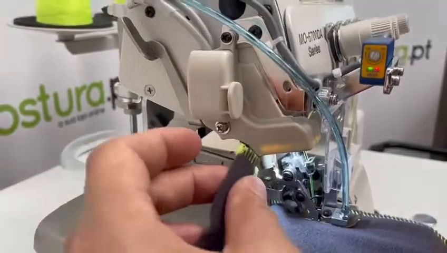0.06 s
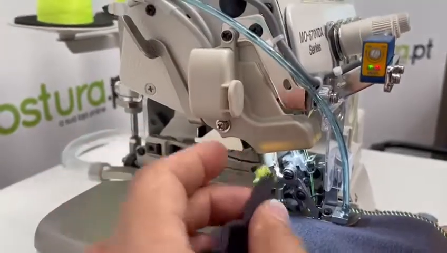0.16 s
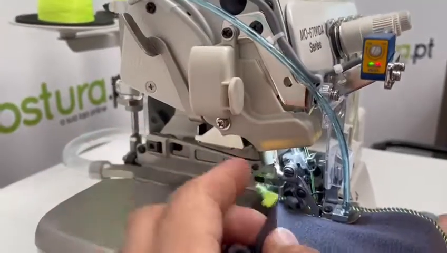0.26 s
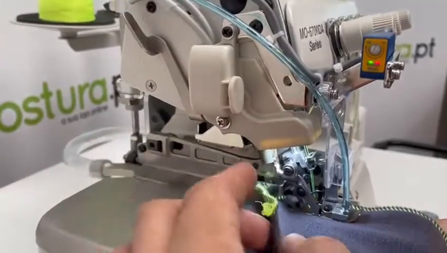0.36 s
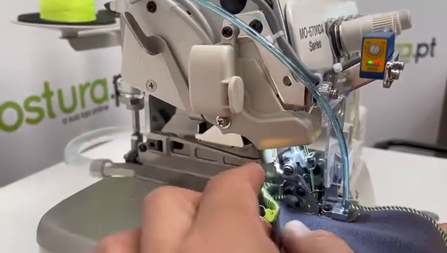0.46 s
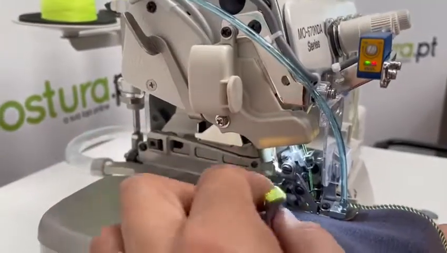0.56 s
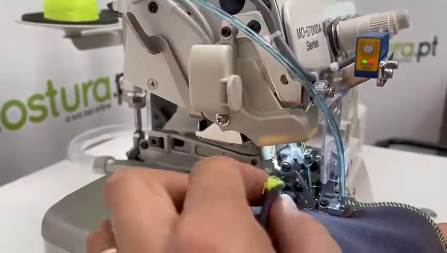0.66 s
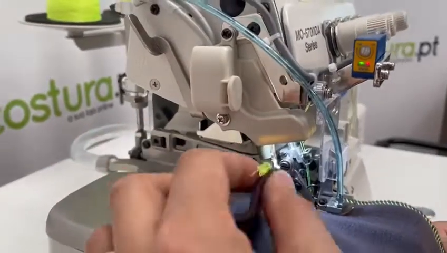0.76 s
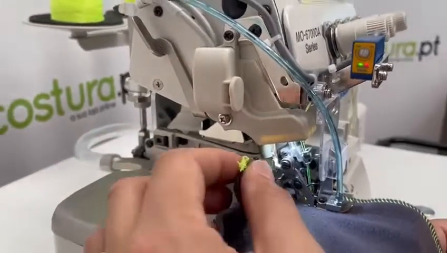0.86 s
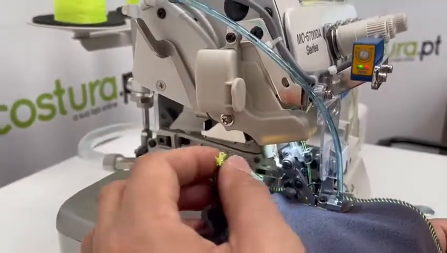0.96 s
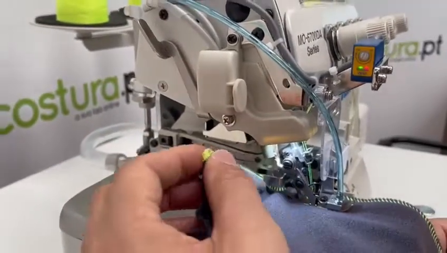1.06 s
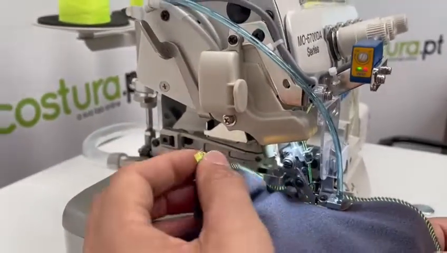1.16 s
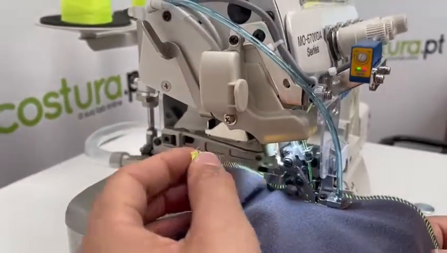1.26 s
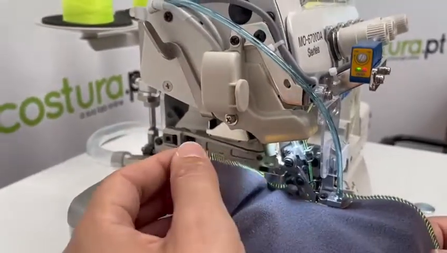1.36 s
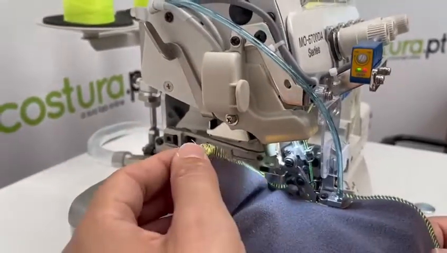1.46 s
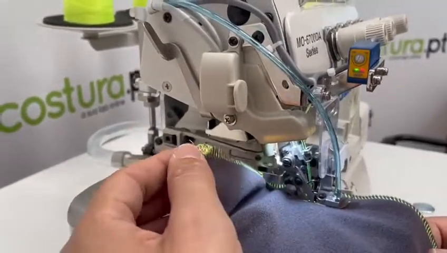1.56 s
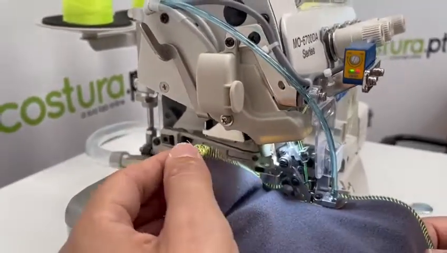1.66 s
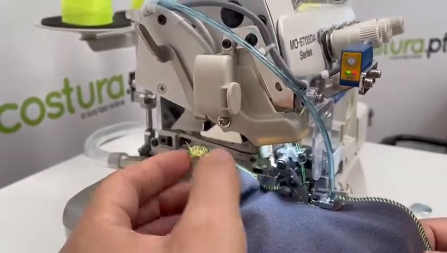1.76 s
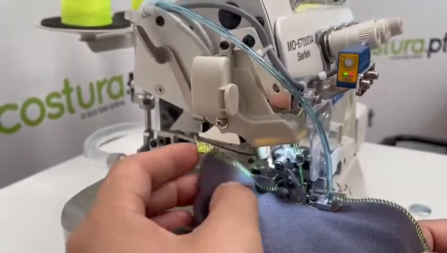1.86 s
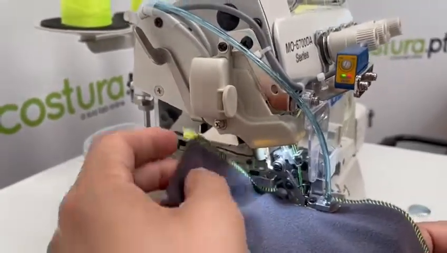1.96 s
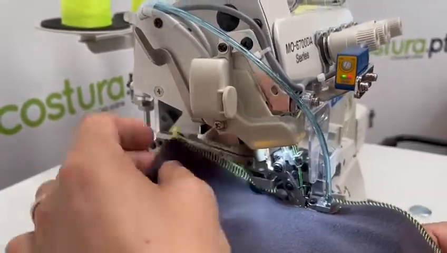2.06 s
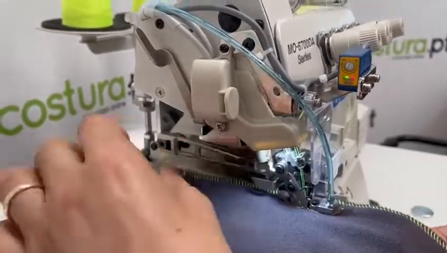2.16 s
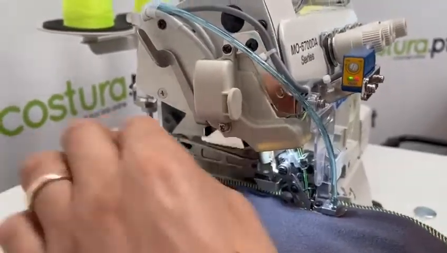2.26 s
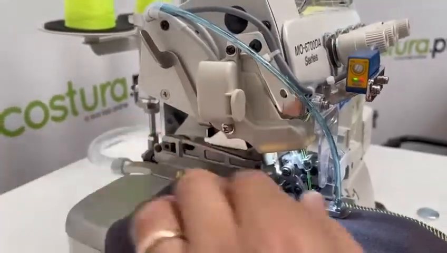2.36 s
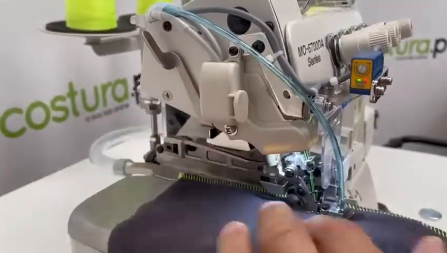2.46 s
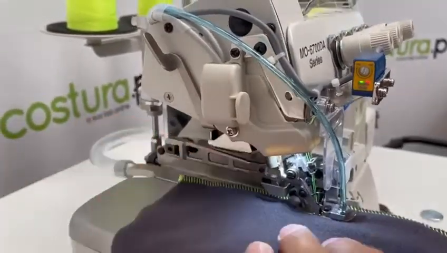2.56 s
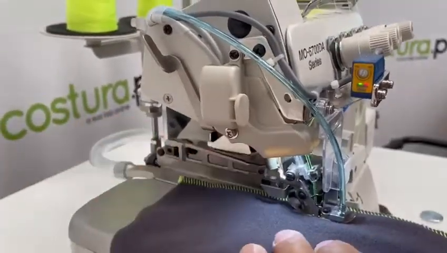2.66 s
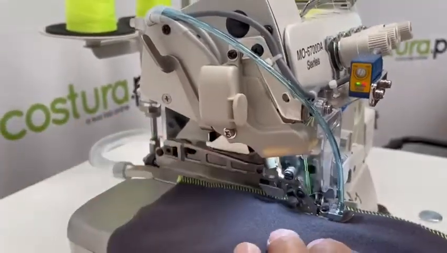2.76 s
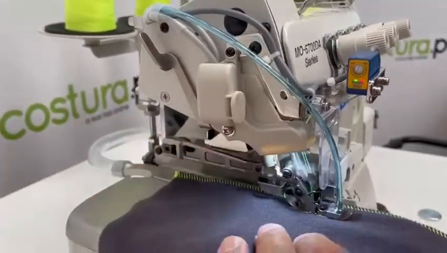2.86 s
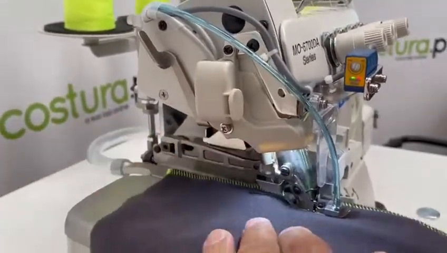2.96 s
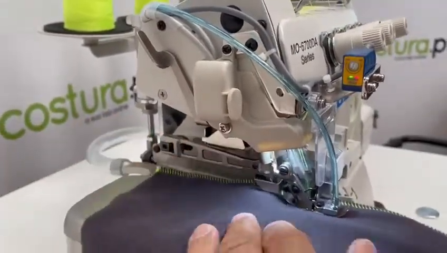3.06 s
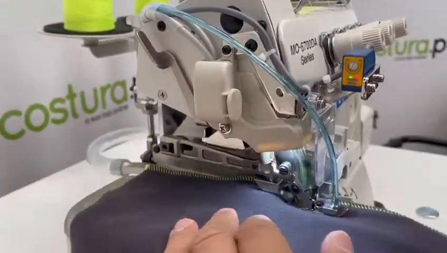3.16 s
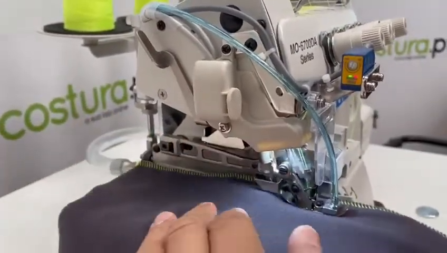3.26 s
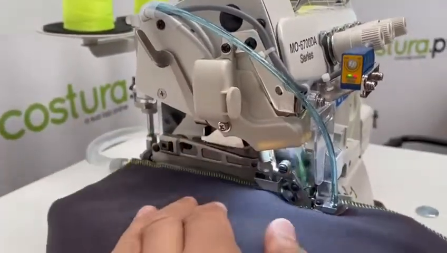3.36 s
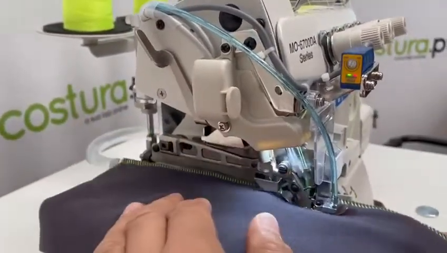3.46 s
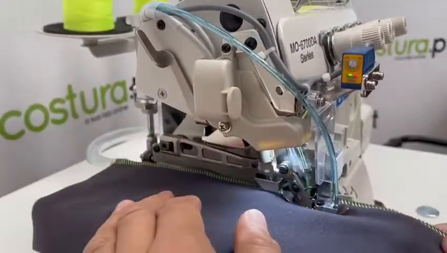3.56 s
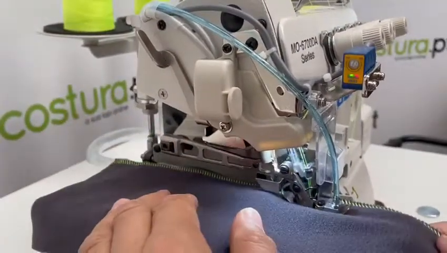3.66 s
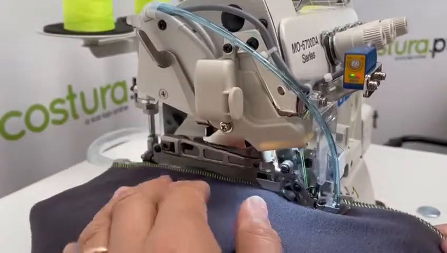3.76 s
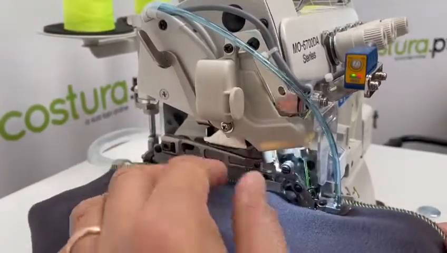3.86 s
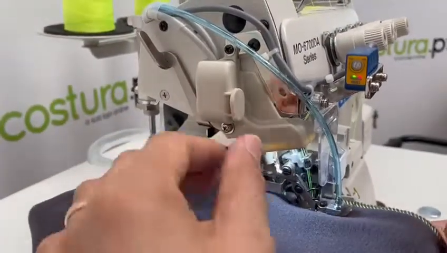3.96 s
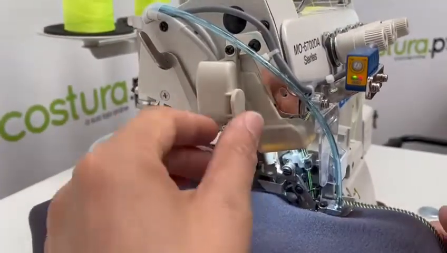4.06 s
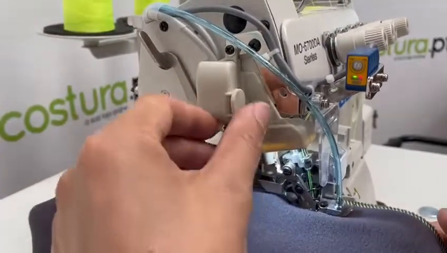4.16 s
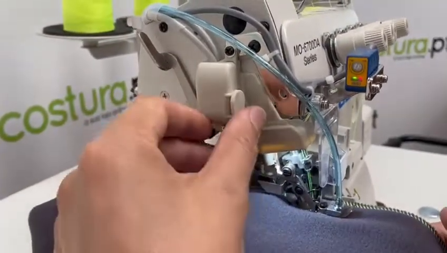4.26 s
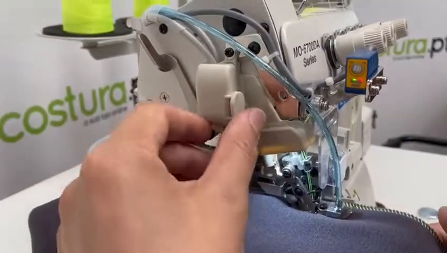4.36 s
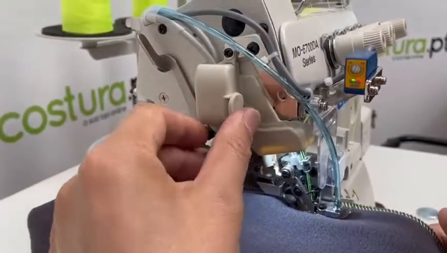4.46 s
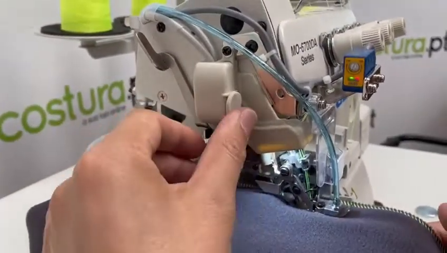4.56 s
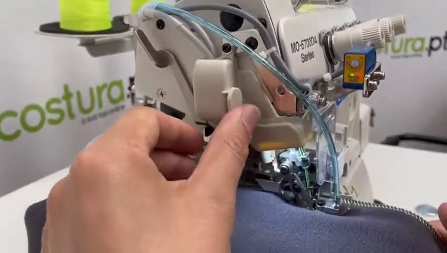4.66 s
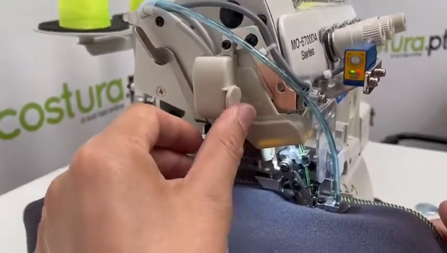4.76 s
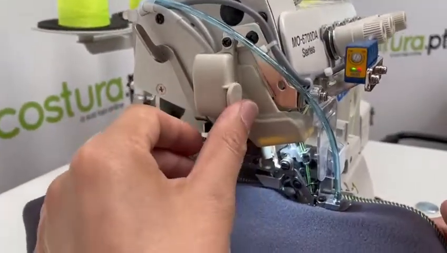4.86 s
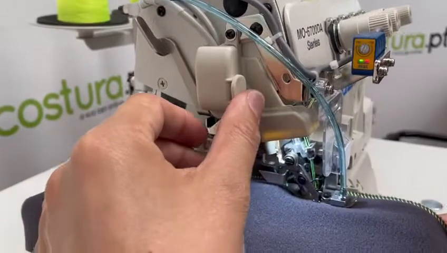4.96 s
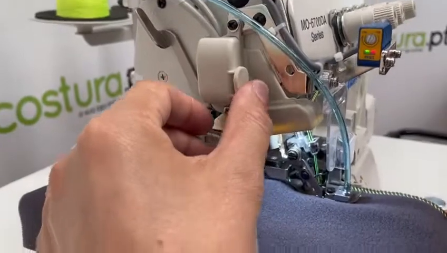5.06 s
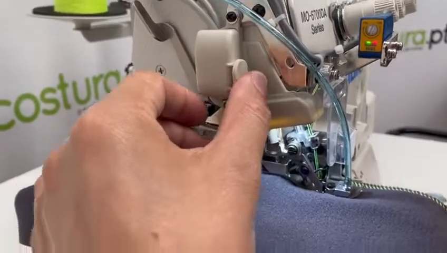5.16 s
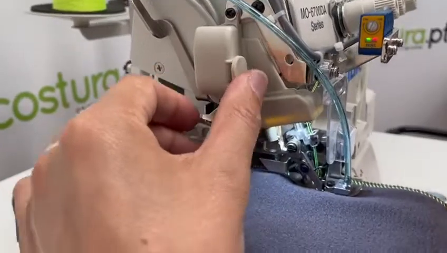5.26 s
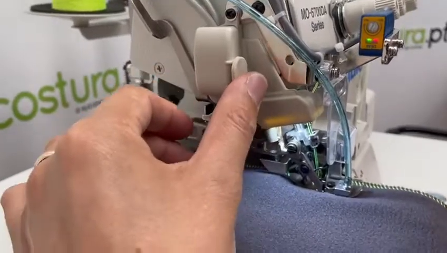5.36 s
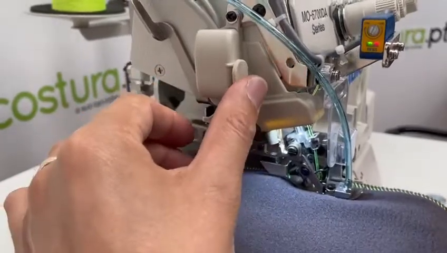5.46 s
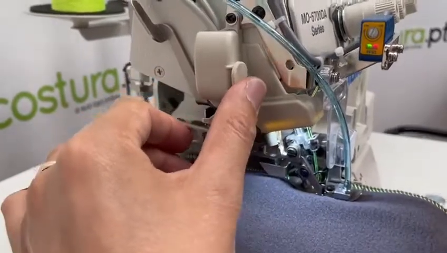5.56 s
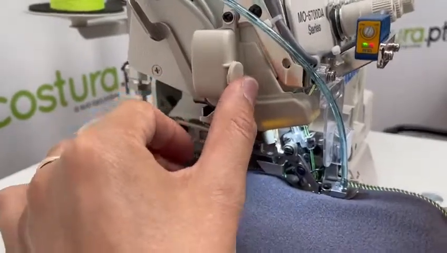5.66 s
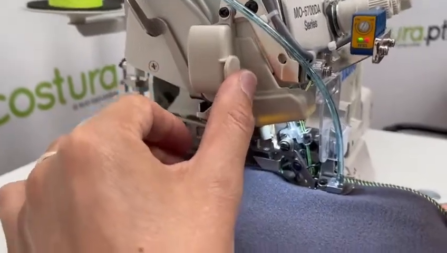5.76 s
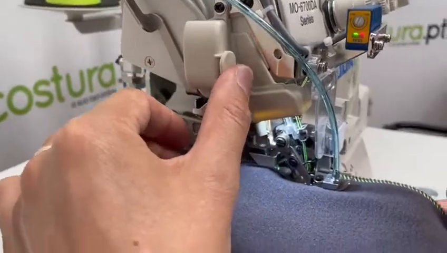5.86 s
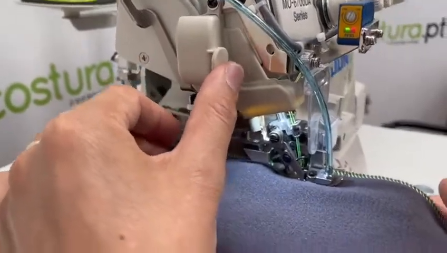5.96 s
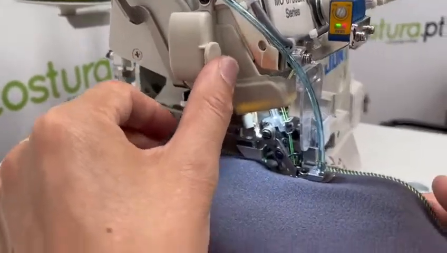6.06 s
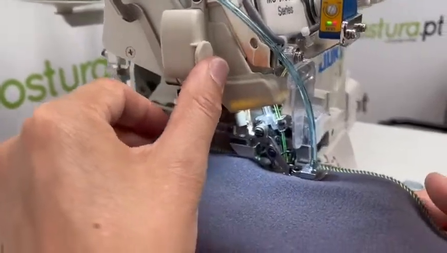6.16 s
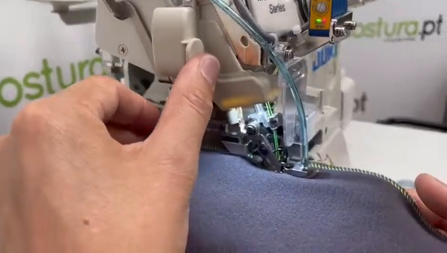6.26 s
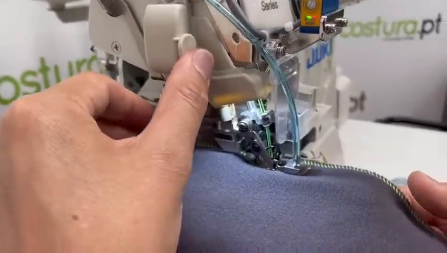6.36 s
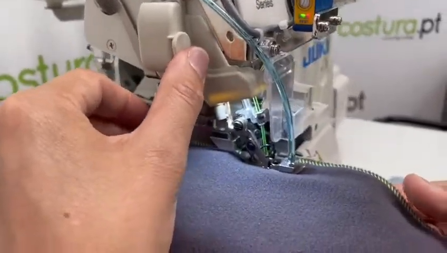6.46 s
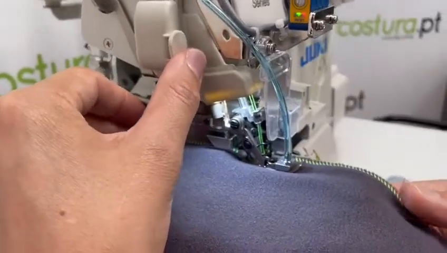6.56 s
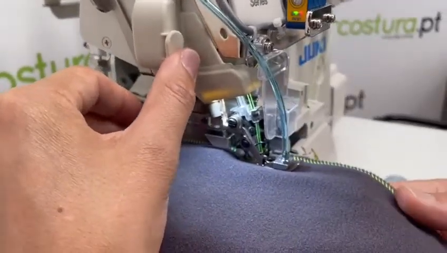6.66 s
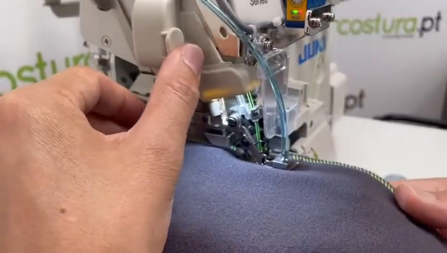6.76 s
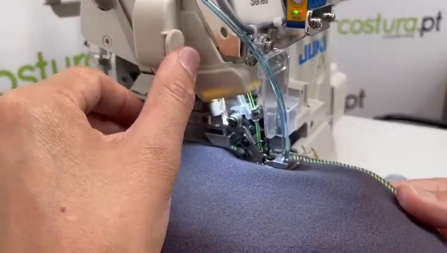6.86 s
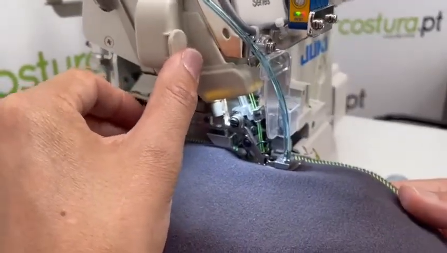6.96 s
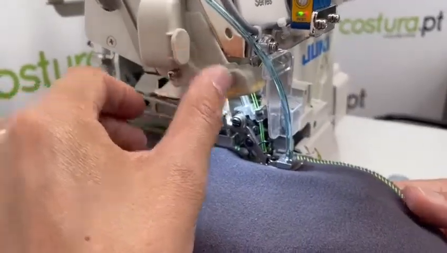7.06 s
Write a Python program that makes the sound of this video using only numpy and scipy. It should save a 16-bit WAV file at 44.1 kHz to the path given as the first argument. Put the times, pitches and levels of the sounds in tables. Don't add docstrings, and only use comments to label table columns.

```python
import sys
import numpy as np
from scipy import signal
from scipy.fft import rfft, irfft, next_fast_len
from scipy.io import wavfile
from scipy.ndimage import uniform_filter1d, map_coordinates

SR = 44100
rng = np.random.default_rng(int(sys.argv[2]) if len(sys.argv) > 2 else 0)


def nominal_scale(level):
    x = np.asarray(level, float) / 20
    return 10 ** x


def digitize_waveform(pressure):
    field = np.atleast_2d(pressure).T
    bounded = np.clip(field, -1, 1)
    quanta = np.round(bounded * 32767).astype(np.int16)
    wavfile.write(sys.argv[1], SR, quanta)


N = 313110

# start_s, level_db
RUMBLE_LEVEL = [(0, -62), (.25, -59.5), (.7, -55), (.96, -59.5), (1.25, -54.5), (1.7, -59), (2.27, -56.5),
                (2.65, -58), (4.6, -55), (5.03, -58), (5.5, -54), (6.2, -52), (6.63, -50.5), (6.84, -59),
                (7.1, -48)]
# pitch_hz, level_db_per_hz
RUMBLE_SPECTRUM = [(13, -39.5), (22, -20), (32, -3), (54, 1.5), (82, -5), (171, -26), (200, -24),
                   (260, -47.5), (440, -120)]
FAR_SPECTRUM = [(88, -16.5), (150, -6), (264, -8), (347, -12.5), (533, -19), (643, -25.5), (701, -26.5),
                (1520, -34.5), (9000, -58.5), (11700, -81), (19800, -120)]
# start_s, length_s, rustle_db, rub_db
STROKES = [(0.035, 0.29, -84, -86), (.2, .18, -92, -81.5), (0.518, 0.12, -84.5, -77),
           (0.694, 0.066, -90, -89), (0.754, 0.087, -85, -88), (0.923, 0.096, -94, -90),
           (1.03, .11, -85, -83), (1.188, 0.085, -100, -85), (1.285, 0.083, -91.5, -83),
           (1.843, 0.096, -90.5, -81.5), (1.922, 0.1, -94, -82), (2.087, 0.12, -83, -76.5),
           (2.23, 0.042, -107, -92), (2.407, 0.21, -90, -84.5), (2.55, 0.41, -82, -77)]
# pitch_hz, level_db_per_hz
RUSTLE_SPECTRUM = [(4500, -38), (6000, -9), (7500, -4), (9000, -1), (11500, -11), (12100, -33)]
RUB_SPECTRUM = [(300, -32), (700, 7), (1500, 1.5), (2500, -1.5), (4000, -9), (5500, -13.5), (7000, -32)]
# pitch_hz, level_db
RUB_TILT = [(600, -7.5), (2000, 0), (4500, 4.5)]
# start_s, peak_db, pitch_hz, t60_s
KNOCKS = [(.377, -59, 840, 0.029), (1.17, -53.5, 970, 0.044), (1.3, -60, 950, 0.11),
          (1.495, -64, 500, 0.07), (1.844, -61, 940, 0.059), (1.884, -78, 2200, 0.018),
          (1.979, -45, 360, 0.32), (1.985, -61, 1500, .1), (2.016, -59, 1050, 0.083),
          (2.02, -51.5, 350, 0.36), (2.204, -61, 1677, 0.03), (2.207, -68.5, 3500, 0.028),
          (3.632, -25.5, 1970, 0.031), (3.648, -23, 2046, 0.043), (3.667, -25, 1710, 0.016)]
# start_s, peak_db, boom_db, tick_db
VALVE_BLOWS = [
    (2.6904, -39.5, -18, 16.5),
    (2.698, -20, -19, -16.5),
    (2.702, -14, -2.5, -19),
    (3.685, -26.5, -9, -17),
    (3.697, -24, 9, -16.5),
    (4.05, -19.5, -19.5, -15),
    (4.054, -17, 11, -9),
    (4.072, -23.5, -4.5, -31),
    (4.127, -33.5, 19, -24.5),
    (4.134, -38, 2, -39),
]
# pitch_hz, level_db, t60_s
FRAME_MODES = [(90.5, -5, 0.078), (128, -4, 0.034), (227, 2, 0.033), (294.5, 0, 0.065), (350, 6.5, 0.018),
               (554, -1, 0.027), (784, -4, 0.041), (1000, -20, 0.021)]
# pitch_hz, level_db_per_hz
HOSE_SPECTRUM = [(60, -35), (130, -8.5), (250, -17.5), (450, -15.5), (850, -2), (1300, -6), (2200, -9.5),
                 (3200, -19), (5000, -60)]
JET_SPECTRUM = [(800, -53.5), (2000, -8), (3000, -1.5), (3900, 1.5), (4700, -1), (5700, -4.5), (6600, -4),
                (8000, -28.5), (10000, -64)]
NOZZLE_SPECTRUM = [(4500, -43.5), (6500, -7), (7600, 3.5), (8300, 4.5), (9000, 3.5), (11500, 4.5),
                   (12100, -27)]
# pitch_hz, likeness
AIR_LIKENESS = [(50, 1), (300, 0.4), (800, 0.73), (1400, 0.12), (2200, 1), (3000, .8), (4500, .85),
                (7200, .8), (8400, .9), (12000, 0.93)]
# pitch_hz, level_db
AIR_TO_WALLS = [(300, 6.5), (1200, 3), (4000, -5.5), (8000, 3), (11000, -2.5)]
# pitch_hz, level_db_per_hz
MOAN_SPECTRUM = [(350, -50.5), (600, -3.5), (800, 2), (1100, 0.5), (1350, -17.5), (2000, -51)]
# start_s, turns_per_s
SHAFT_SPEED = [(2.86, 40), (3.0, 48), (3.08, 51.7), (3.16, 52.3), (3.22, 51.2), (3.28, 47.3), (3.38, 45.2),
               (3.58, 42.3), (3.72, 38)]
# pitch_hz, width_hz, level_db
CASTING_MODES = [(191, 60, -26.5), (326, 130, -16), (544, 50, -6.5), (733, 76, 0.5), (891.7, 83, 3.5),
                 (1100, 330, -17.5), (1386, 90, -22)]
# start_s, peak_db, lower_modes_db
CLICKS = [(4.523, -18, -18), (4.6753, -16.5, -20), (4.8052, -16.5, -19), (4.9349, -17, -20.5),
          (5.6551, -15.5, -19.5), (5.8245, -18, -17), (5.9636, -15, -19), (6.087, -16.5, -17.5),
          (6.2128, -15.5, -17.5), (6.3514, -17.5, -15.5), (6.6998, -19, -13.5), (6.7662, -17, -14),
          (6.8746, -15, -16.5), (7.021, -14.5, -16)]
# pitch_hz, level_db, t60_s
LEVER_MODES = [(844, -31, 0.086), (1841, -5, 0.013), (2738, 2, 0.0095), (4044, -2, 0.022),
               (4956, -7, 0.031), (6630, -9.5, 0.027)]
LEVER_TOP_MODES = [(9420, -18.5, 0.0064), (9690, -18.5, 0.013)]
# pitch_hz, difference_db
LEVER_SIDE = [(1000, 3), (1900, 6), (2500, 12), (3000, -2), (4000, 10.5), (5300, 7), (6200, 4.5),
              (7500, 4.5), (8200, 0.5)]
# pitch_hz, t60_s
HALL_DECAY = [(100, 0.65), (1000, 0.98), (4000, 0.78), (8000, 0.54), (12000, 0.18)]
# pitch_hz, likeness
FAR_LIKENESS = [(50, 1), (200, 0.97), (800, 0.24), (1600, 0.094), (2500, 0.73), (4000, 0.52), (5000, 0.28),
                (6200, 0.64), (7200, 0.28), (8400, 0.91), (12000, 1)]
# pitch_hz, level_db
PORT_RESPONSE = [(18, -31), (32, -12), (45, -7), (8600, 3), (9500, 9.5), (10300, 10.5), (10900, 11.5),
                 (11300, 7.5), (11700, 2), (12000, -15.5), (12800, -36.5), (13300, -120)]
# pitch_hz, lead_rad
PORT_TURN = [(900, 0), (1500, -.7), (2000, 0), (2900, 1), (4300, .1), (6500, -.2), (7400, .8), (8500, 0),
             (9150, -1.2), (10200, -3.14), (11200, -5.2), (11600, -6.2), (13000, -6.28)]

OPEN_S, SHUT_S = 2.69, 4.047
SPIN_S, BITE_S, BRAKE_S = 2.88, 3.0, 3.64


def unit(x):
    return x / np.sqrt(np.mean(x ** 2) + 1e-20)


def along(points, hz):
    f, v = np.transpose(points)
    return np.interp(np.log(hz + 1), np.log(f + 1), v)


def curve(rows):
    s, value = np.transpose(rows)
    return np.interp(np.arange(N) / SR, s, value)


def swell(start, rise, end, fall):
    t = np.arange(N) / SR
    rising = 1 - np.exp(-np.clip(t - start, 0, None) / rise)
    return rising * np.exp(-np.clip(t - end, 0, None) / fall)


def wobble(rate):
    knots = rng.standard_normal(int(N * rate / SR) + 4)
    coarse = np.arange(0, N + 64, 64)
    return np.interp(np.arange(N), coarse, map_coordinates(knots, [coarse * rate / SR]))


def filtered(x, response):
    m = next_fast_len(x.shape[-1] + SR // 2)
    return irfft(rfft(x, m) * response(np.fft.rfftfreq(m, 1 / SR)), m)[..., :x.shape[-1]]


def paired(pair, alike):
    def shares(hz):
        angle = np.arccos(np.clip(along(alike, hz), -1, 1)) / 2
        return np.array([np.cos(angle), np.sin(angle)])

    mid, side = filtered(pair, shares)
    return np.array([mid + side, mid - side])


def rush(spectrum, patchy_db, alike=FAR_LIKENESS):
    z = signal.stft(rng.standard_normal((2, N)), nperseg=512)[2]
    field = uniform_filter1d(rng.standard_normal(z.shape[1:]), size=6, axis=0)
    field = uniform_filter1d(field, size=10, axis=1)
    pair = signal.istft(z * nominal_scale(patchy_db * unit(field)), nperseg=512)[1][:, :N]
    coloured = filtered(pair, lambda hz: nominal_scale(along(spectrum, hz)))
    return unit(paired(coloured, alike))


def puff(t, lo_hz, hi_hz, t60):
    band = signal.butter(2, [lo_hz, hi_hz], "bandpass", fs=SR)
    return unit(signal.lfilter(*band, rng.standard_normal(len(t)))) * nominal_scale(-60 * t / t60)


def ring(modes, t, attack, scatter_db):
    tones = np.zeros(len(t))
    for hz, db, t60 in modes:
        level_db = db + scatter_db * rng.normal() - 60 * t / t60
        tones += nominal_scale(level_db) * np.sin(2 * np.pi * hz * t)
    return tones * (1 - np.exp(-t / attack))


def add(track, s, sound):
    part = track[round(s * SR):][:len(sound)]
    part += sound[:len(part)]


def cloth(fading):
    t = np.arange(N) / SR
    arcs = []
    for start, length, *_ in STROKES:
        phase = np.clip((t - start) / length, 0, 1)
        arc = np.sin(np.pi * phase).clip(0) ** 2.1
        settling = nominal_scale(-9) * swell(start + length / 2, length / 4, start + length, 0.053)
        arcs.append((arc + settling) * (t < OPEN_S))
    rustle, rub = nominal_scale(np.array(STROKES)[:, 2:].T) @ arcs
    dull = rush(RUB_SPECTRUM, patchy_db=3.0)
    crisp = rustle * nominal_scale(2.5) * rush(RUSTLE_SPECTRUM, patchy_db=4.0)
    close_rub = rub * filtered(dull, lambda hz: nominal_scale(along(RUB_TILT, hz)))
    return nominal_scale(1.7 * wobble(39.14)) * (crisp + close_rub + fading * dull[:, ::-1])


def workshop():
    rumble_db = curve(RUMBLE_LEVEL)
    fading = nominal_scale(-70.5 - 60 * np.arange(N) / SR / 0.83)
    rumble = nominal_scale(rumble_db + 2.5 + 0.66 * wobble(4.2)) * rush(RUMBLE_SPECTRUM, patchy_db=0.5)
    late_machine = nominal_scale(-68) * swell(6.39, 0.29, N / SR, 1) ** 2
    machines = nominal_scale(-70 + 0.18 * (rumble_db - rumble_db.mean())) + late_machine
    far = (machines + nominal_scale(2.5) * fading) * nominal_scale(3.0 + 1.6 * wobble(13))
    return rumble + far * rush(FAR_SPECTRUM, patchy_db=1.0) + cloth(fading)


def hall(x, bloom):
    out, step = np.zeros((2, N + 2 * SR)), SR // 5
    for start in range(0, N, step):
        piece = x[start:start + step]
        if np.abs(piece).max() > 1e-5:
            hz, t, z = signal.stft(rng.standard_normal((2, SR * 3 // 4)), SR, nperseg=256)
            decay = nominal_scale(-60 * t / along(HALL_DECAY, hz)[:, None]) * (1 - np.exp(-t / bloom))
            tail = signal.istft(z * decay, SR, nperseg=256)[1]
            wet = signal.fftconvolve(piece[None], tail / np.linalg.norm(tail[0]), axes=1)
            out[:, start:start + wet.shape[1]] += wet
    return paired(out[:, :N], FAR_LIKENESS)


def knocks():
    out, t = np.zeros(N), np.arange(SR // 8) / SR
    for s, db, hz, t60 in KNOCKS:
        soft_start = 1 - np.exp(-t / 0.0023)
        add(out, s, nominal_scale(db - 5) * puff(t, hz / 1.35, hz * 1.2, t60) * soft_start)
    return out


def valve():
    rings, thuds, t = np.zeros(N), np.zeros(N), np.arange(SR // 4) / SR
    for s, db, boom_db, tick_db in VALVE_BLOWS:
        boom = nominal_scale(boom_db) * ring(FRAME_MODES[:2], t, 0.0033, 0.5)
        add(rings, s, nominal_scale(db - 4.5) * (boom + ring(FRAME_MODES[2:], t, 0.0015, 1.5)))
        thud = 1.3 * puff(t, 120, 860, 0.03)
        tick = nominal_scale(tick_db + 3.5) * puff(t, 2200, 3900, 0.011)
        add(thuds, s, nominal_scale(db - 5.5) * (thud + tick))
    return rings, thuds


def suction(load, chop):
    fill_s, vent_s = 0.1, 0.022
    gasp_s, kick_s = 0.0057, 0.006
    freed_s, freed_rise_s = 3.77, 0.024
    gasp = swell(OPEN_S, 1e-3, OPEN_S, gasp_s)
    kick = nominal_scale(-7) * swell(SHUT_S - kick_s, 1e-3, SHUT_S, vent_s)
    flow = swell(OPEN_S, fill_s, SHUT_S, vent_s)
    freed = swell(freed_s, freed_rise_s, freed_s, 0.11)
    slow = nominal_scale(-2) * gasp + flow + kick
    nozzle_flow = swell(OPEN_S + 2 * gasp_s, 0.02, SHUT_S, vent_s)
    quick = nominal_scale(4) * gasp + nozzle_flow + 0.37 * kick

    hose = nominal_scale(-42 + 3.5 * load) * slow * rush(HOSE_SPECTRUM, 2.76, AIR_LIKENESS)
    sputter_db = 1.3 + 3.5 * swell(OPEN_S, fill_s, 2.93, fill_s / 2)
    jet_db = -38.5 + 7 * freed + sputter_db * wobble(30)
    jet = nominal_scale(jet_db) * slow * rush(JET_SPECTRUM, 1.3, AIR_LIKENESS)
    hiss_up = swell(BRAKE_S, freed_rise_s, freed_s, freed_rise_s)
    nozzle_db = -37.5 + 1.5 * hiss_up + 0.54 * wobble(28)
    nozzle = nominal_scale(nozzle_db) * quick * rush(NOZZLE_SPECTRUM, 3.5, AIR_LIKENESS)
    lint = nominal_scale(1 * wobble(140))
    return chop * (lint * (hose + jet) + nozzle), flow * (1 - load) * nominal_scale(5.5 * freed)


def moan(empty):
    tube = unit(filtered(rng.standard_normal(N), lambda hz: nominal_scale(along(MOAN_SPECTRUM, hz))))
    return nominal_scale(-44.5 + 2.0 * wobble(15)) * empty * tube


def casting(f):
    answer = 0
    for k, (centre, width, db) in enumerate(CASTING_MODES):
        answer = answer + (-1) ** k * nominal_scale(db) * 1j * f * width / (centre ** 2 - f * f + 1j * f * width)
    return answer


def table(f):
    return 1j * f * 5.5 / (53 ** 2 - f * f + 1j * f * 5.5) + 0.08j


def stitching():
    load = swell(BITE_S, 0.026, BRAKE_S, 0.03)
    idle = swell(SPIN_S, 0.054, BRAKE_S, 0.03)
    sag_db = -5.5 * np.clip(np.arange(N) / SR - BITE_S, 0, None)
    span = slice(round(SHAFT_SPEED[0][0] * SR), round(SHAFT_SPEED[-1][0] * SR))
    speed = curve(SHAFT_SPEED)
    turns = np.cumsum(speed) / SR
    orders = np.zeros(N)
    for k in range(2, 34):
        answer = casting(k * speed[span]) * nominal_scale(2.6 * wobble(6)[span])
        phase = k * turns[span] + 0.2 * rng.normal()
        orders[span] += np.real(answer * np.exp(2j * np.pi * phase))
    rub = filtered(rng.standard_normal(N) * (1 + 0.52 * np.cos(2 * np.pi * turns)), casting)
    drone = orders / np.std(orders[span]) + 0.38 * unit(rub)
    drone = drone * (nominal_scale(-7) * idle + load * nominal_scale(sag_db))
    rocking = filtered(load * np.sin(2 * np.pi * turns), table)
    rocking = rocking + 0.04 * load * np.sin(4 * np.pi * turns)
    shake = np.sqrt(2) * rocking * swell(0, 1e-3, BRAKE_S, 0.012)
    chop = 1 + 0.076 * load * np.cos(2 * np.pi * turns)
    return nominal_scale(-35.5) * drone + nominal_scale(-29) * shake, load, chop


def lever():
    rings, snaps, t = np.zeros(N), np.zeros(N), np.arange(SR // 8) / SR
    for s, db, low_db in CLICKS:
        pitch_hz = 11050 * (1 + 0.01 * rng.normal())
        snap = np.exp(-((t - 0.001) / 0.00034) ** 2) * np.sin(2 * np.pi * pitch_hz * t)
        add(snaps, s - 0.0011, nominal_scale(db - 8.5) * snap)
        rebound_db = db - 27.0 + 0.5 * rng.normal()
        add(snaps, s + 0.0022, nominal_scale(rebound_db) * puff(t, 9100, 12000, 0.015))
        add(snaps, s, nominal_scale(db - 14.5) * puff(t, 8000, 10000, 0.0072))
        add(snaps, s, nominal_scale(db + low_db - 4) * puff(t, 1960, 8900, 0.019))
        add(rings, s, nominal_scale(db - 6) * ring(LEVER_TOP_MODES, t, 0.00024, 1.4))
        add(rings, s, nominal_scale(db + low_db) * ring(LEVER_MODES, t, 0.0013, 1.6))
    return rings, snaps


def scene():
    background = workshop()
    bumps = knocks()
    frame, thuds = valve()
    seam, load, chop = stitching()
    air, empty = suction(load, chop)
    seam = seam + moan(empty)
    steel, snaps = lever()
    clicks = filtered(steel + snaps, lambda hz: nominal_scale(np.outer([.5, -.5], along(LEVER_SIDE, hz))))

    to_walls = nominal_scale(-8.5) * (thuds + nominal_scale(-2) * frame) + nominal_scale(-17) * (snaps + nominal_scale(-2) * steel)
    to_walls += nominal_scale(-11.5) * filtered(air[0], lambda hz: nominal_scale(along(AIR_TO_WALLS, hz)))
    to_walls += nominal_scale(-17.5) * seam + nominal_scale(-4.5) * bumps

    near = (seam + bumps) * nominal_scale([[.5], [-.4]]) + (frame + thuds) * nominal_scale([[1.5], [-1.5]])
    return near + air + clicks + hall(to_walls, bloom=0.011) + background


def thinned(x, margin_db, quiet_db):
    z = signal.stft(np.array([x[0] + x[1], x[0] - x[1]]) / 2, nperseg=2048)[2][:, :1024]
    power = (abs(z) ** 2).reshape(2, 64, 16, -1).sum(axis=2)
    power = uniform_filter1d(power, size=2, axis=2)
    whole = power[:, 4:].sum(axis=(0, 1))
    blow = whole > 8 * np.roll(whole, 2)
    margin = nominal_scale(2 * margin_db) * whole / (whole + nominal_scale(2 * quiet_db))
    keep = (power > margin * power[::-1]) | blow | np.roll(blow, 1)
    keep[:, :2] = True
    kept = np.pad(z * np.repeat(keep, 16, axis=1), ((0, 0), (0, 1), (0, 0)))
    mid, side = signal.istft(kept, nperseg=2048)[1][:, :N]
    return np.array([mid + side, mid - side])


def roll_off(x):
    return signal.sosfilt(signal.butter(12, 13100, fs=SR, output="sos"), x)


def record(dry):
    grid = np.fft.rfftfreq(4096, 1 / SR)
    cepstrum = irfft(np.log(nominal_scale(along(PORT_RESPONSE, grid))))
    cepstrum[1:2048] *= 2
    cepstrum[2049:] = 0
    resonance = irfft(np.exp(rfft(cepstrum)))
    rung = signal.fftconvolve(dry, resonance[None], axes=1)[:, :N]
    ports = filtered(rung, lambda hz: np.exp(.5j * np.outer([1, -1], along(PORT_TURN, hz))))
    mix = thinned(ports, margin_db=-6.5, quiet_db=-59.0)
    return roll_off(mix)


dry = scene()
out = record(dry)
digitize_waveform(out)
```